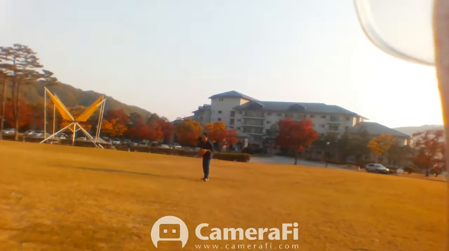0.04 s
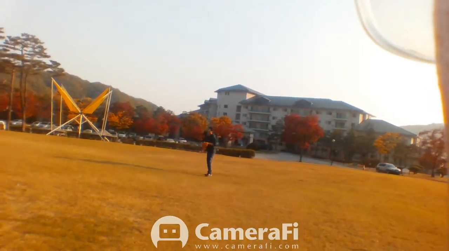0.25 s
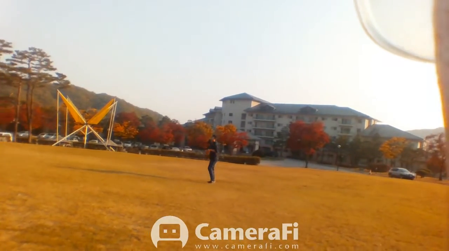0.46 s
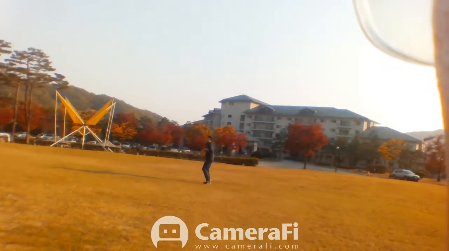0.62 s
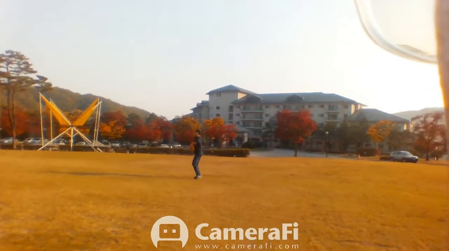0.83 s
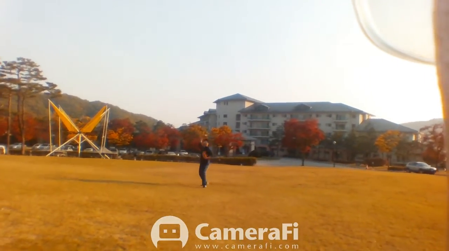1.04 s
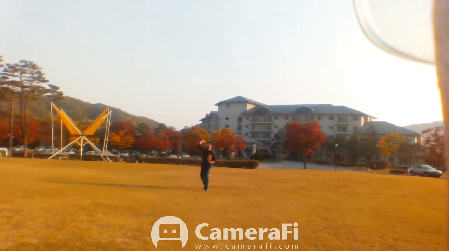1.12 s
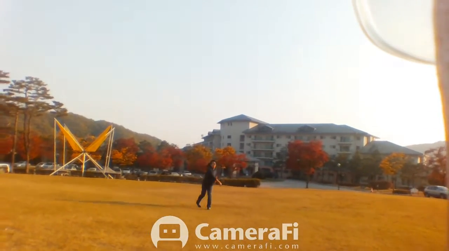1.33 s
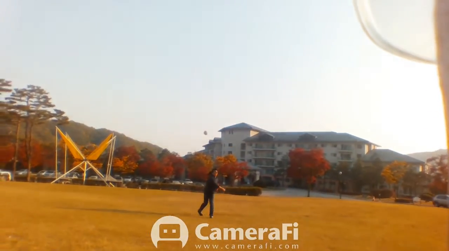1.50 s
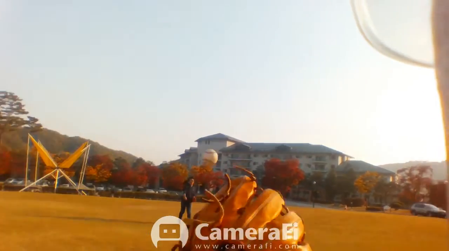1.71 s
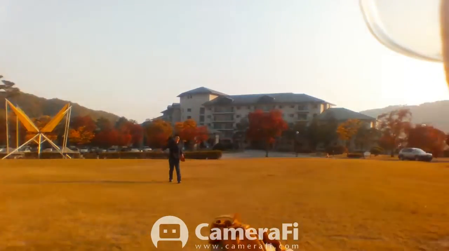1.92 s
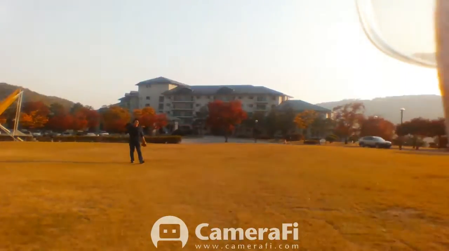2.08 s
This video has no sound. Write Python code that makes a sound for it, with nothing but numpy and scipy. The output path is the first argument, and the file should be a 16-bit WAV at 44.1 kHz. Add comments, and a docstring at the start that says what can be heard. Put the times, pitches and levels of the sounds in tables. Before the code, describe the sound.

A ball smacks sharply into a leather glove right beside a small head-worn microphone, slightly overloaded. Before it, wind rumbles, thuds and crackles heavily, then drops away; afterwards only faint rustles and quiet outdoor hush on an open lawn.

```python
"""An open lawn: a thrown ball smacks into a leather glove next to a small head-worn camera.
Wind buffets the microphone: coloured noise rumbles, while pointed pulses thud and noise bursts crackle.
A damped housing resonance shapes the wind and dulls its treble. Damped modes and noise form the smack,
which overloads the input; the lawn scatters a faint late answer. A hush and soft rustles lie beneath.
"""
import sys
import numpy as np
from scipy import signal
from scipy.fft import rfft, irfft, next_fast_len
from scipy.io import wavfile
from scipy.ndimage import map_coordinates

SR = 44100
rng = np.random.default_rng(int(sys.argv[2]) if len(sys.argv) > 2 else 0)


def to_wav(sig):
    """Store sig (one row per channel, or 1-D mono) as 16-bit WAV at the path in sys.argv[1].

    Samples outside -1..1 are clipped; the rate is SR.
    """
    pcm = np.clip(np.atleast_2d(sig), -1, 1) * 32767
    pcm = np.round(pcm).astype(np.int16)
    wavfile.write(sys.argv[1], SR, pcm.T)  # frames by channels


N = 94815
T = np.arange(N) / SR  # time axis [s]

# Strength of the wind: t/s, level/dB; the brief rise at 1.7 s is a low thump that comes with the smack
WIND_STRENGTH = [(0.0, -51.5), (0.15, -25), (0.17, -29.5), (0.27, -24), (0.3, -30.5), (0.48, -31),
                 (0.54, -16.5), (0.6, -31), (0.66, -15), (0.7, -29.5), (0.72, -15.5), (0.85, -18.5),
                 (0.97, -16), (0.98, -19.5), (1.13, -20.5), (1.16, -11.5), (1.41, -29), (1.44, -25.5),
                 (1.51, -47.5), (1.64, -62), (1.7, -25.5), (1.78, -38.5), (1.93, -34), (2.06, -45),
                 (2.1, -28), (2.15, -38.5)]
# Spectrum of the low rumble: f/Hz, relative level/dB [dB per Hz]
RUMBLE_SPECTRUM = [(8.8, -29.5), (15, 0), (59, 1), (140, -14.5), (180, -38), (310, -120)]
# Spectrum of the upper part of the rumble: f/Hz, relative level/dB [dB per Hz]
FLUTTER_SPECTRUM = [(70, -28), (140, -1.13), (260, -7.5), (450, -23), (700, -75.5)]
# Single buffets: t/s, crackle level/dB, crackle decay/ms (before CRACKLE_STRETCH),
# thud level/dB (before THUD_LIFT_DB)
BUFFETS = [(0.099, -83, 1.9, -28.5), (0.1425, -76, 1.8, -46), (0.2035, -48.5, 2.4, -31),
           (0.219, -40, 0.78, -18), (0.2685, -21, 1.42, -12.5), (0.344, -60, 2.6, -35),
           (0.3667, -62, 1.3, -23.5), (0.4159, -55, 2.2, -20.5), (0.4433, -51.5, 4.2, -20),
           (0.4939, -32, 0.68, -8.5), (0.504, -32, 1.8, -31.5), (0.539, -16.5, 3, -5.5),
           (0.5487, -25, 1.3, -13), (0.5697, -42, 2.2, -33), (0.5838, -44, 3.5, -20),
           (0.602, -66.5, 2.5, -40), (0.6202, -36, 1.5, -23), (0.6509, -21.5, 1.7, -8),
           (0.667, -25.5, 1.1, -28), (0.687, -40, 4.3, -17), (0.7224, -19.5, 0.78, -16),
           (0.7304, -20.0, 3.8, -12), (0.743, -16, 1.86, -8.5), (0.756, -30, 2.3, -12),
           (0.7755, -19.5, 4.1, -6.0), (0.7885, -42, 1.6, -28), (0.797, -44.5, 1.8, -13),
           (0.8202, -18.5, 2, -10.0), (0.836, -27, 3.3, -10.5), (0.8611, -20.5, 2.9, -10),
           (0.9191, -23.5, 1.7, -11.5), (0.93, -28, 1.4, -9.5), (0.9521, -26.0, 1.4, -25),
           (0.9662, -25.5, 1.6, -12), (0.9871, -27, 0.77, -13), (0.9973, -28, 2, -17),
           (1.0075, -30.5, 2, -11.5), (1.0353, -34.5, 2.9, -37.5), (1.0478, -40.5, 1.1, -18.0),
           (1.0536, -36, 1.3, -14), (1.0682, -34.5, 2.1, -13.5), (1.09, -41, 3.7, -16.5),
           (1.1155, -42, 2.9, -24.5), (1.1383, -32, 3.7, -14), (1.1491, -43.5, 0.9, -14.5),
           (1.1634, -23, 4.5, -9.5), (1.1806, -36, 0.9, -9.5), (1.194, -21, 2.2, -9.5),
           (1.209, -26.0, 2.1, -10), (1.2216, -42.5, 1.7, -24), (1.2351, -46, 1.1, -32.5),
           (1.244, -36.5, 2.8, -14), (1.2581, -27, 1.1, -41), (1.266, -32, 1.2, -12.5),
           (1.2844, -53.5, 0.95, -19), (1.2943, -66, 2.5, -21.5), (1.3321, -45.5, 2.8, -17.5),
           (1.3467, -42, 1.9, -28), (1.369, -52, 3.0, -23), (1.3865, -62, 1.8, -33),
           (1.4262, -48, 3.0, -22), (1.4525, -63, 1.5, -55), (1.8857, -69, 1.8, -43),
           (1.8987, -62.5, 3.0, -27), (1.933, -73, 2.8, -40), (2.0742, -64, 4.8, -48),
           (2.1052, -61, 7.8, -33), (2.115, -58, 3.0, -50), (.533, -25, 1.5, -22.5), (.7075, -30, 1.2, -24),
           (.7145, -23.5, 0.8, -9), (.8665, -20, 1.2, -13), (.876, -32, 1.73, -11.5), (.909, -26, 1.5, -18)]
# Spectrum of the crackle: f/Hz, relative level/dB [dB per Hz]
CRACKLE_SPECTRUM = [(150, -30.5), (350, 8.15), (700, -4.5), (1200, -16.5), (1800, -24), (2300, -55),
                    (3000, -82)]
# Spectrum of the distant outdoor hush: f/Hz, relative level/dB [dB per Hz]
HUSH_SPECTRUM = [(53, -30.5), (90, 13), (357, -12.5), (483, -10), (538, -15), (727, -10), (810, -18.5),
                 (883, -10), (1270, -11), (1550, -4), (2830, -29.5), (9440, -35.5), (15500, -45)]
# Faint rustles: t/s, level/dB, half length/s
RUSTLES = [(1.324, -56.5, 0.0081), (1.396, -51, .01), (1.885, -61, 0.019), (1.958, -53.5, 0.046),
           (2.03, -51, .01), (2.073, -56.5, 0.023)]
# Spectrum of the rustles: f/Hz, relative level/dB [dB per Hz]
RUSTLE_SPECTRUM = [(300, -9), (700, -4), (1100, -2), (1600, 5.5), (2200, -15), (4000, -46)]
# Contacts, in turn: ball meets web, ball meets palm, glove snaps shut: t/s, level/dB
CONTACTS = [(1.6968, -12), (1.698, 2), (1.7002, -3)]
# Modes of the hollow pocket: f/Hz, level/dB, decay by 60 dB [s]
POCKET_MODES = [(80, -30.5, .03), (348.4, -15, .04), (770, -8, .035), (1197, -8.5, 0.043), (1554, -1, .04),
                (1710, -14.5, 0.045)]
# Bright short modes of the leather: f/Hz, level/dB
LEATHER_MODES = [(3400, -12.5), (4600, -9.5), (6300, -25.5), (8100, -30.5), (10300, -28.5), (13600, -30)]
# Spectrum of the leather slap: f/Hz, relative level/dB [dB per Hz]
SLAP_SPECTRUM = [(120, -40.5), (200, 1), (1300, -0.5), (1590, -9), (2330, -7), (4500, -35), (5590, -37),
                 (8350, -20), (9140, -36), (15500, -44)]
# Spectrum of the ball scuffing into the pocket: f/Hz, relative level/dB [dB per Hz]
SCUFF_SPECTRUM = [(1500, -36), (2300, -4), (4500, 1.6), (5500, -20), (8500, -20), (11000, -22),
                  (15500, -27.5)]
# Scatter off the lawn: f/Hz, decay by 60 dB [s]
LAWN_DECAY = [(300, .13), (1500, .17), (3000, .15), (8000, .1)]

LUMPS_DB, RUMBLE_LUMPS_PER_S, FLUTTER_LUMPS_PER_S = 3.5, 16, 45
# Growth: dB per dB of wind strength, counted from the strongest wind
FLUTTER_DB, FLUTTER_GROWTH = -10, 1.352
EDDIES_PER_S, EDDY_DB, EDDY_RANGE_DB, EDDY_MS, EDDY_GROWTH = 90, -5.5, 5, 2.3, 0.63
CRACKLE_STRETCH = 1.1
THUD_MS, THUD_MS_PER_DB, THUD_LIFT_DB = 0.97, 0.05, 5.5  # weaker thuds are broader
# Suction beside each spike: depth over its height; width and lag over its width
TROUGH_DEPTH, TROUGH_WIDTH, TROUGH_LAG = 0.49, 2.33, 1.97
HOUSING_HZ, HOUSING_WIDTH_HZ, HOUSING_EDGE_HZ = 1780, 2100, 2100
HUSH_DB = -55.5
RISE_S, LEATHER_T60_S = 0.00037, 0.007
SLAP_DB, SLAP_T60_S = -14, 0.03
SCUFF_START_S, SCUFF_STOP_S, SCUFF_DB, SCUFF_FADE_DB = 1.698, 1.7175, -30.5, -7
LAWN_LAG_S, LAWN_DB, LAWN_EDGE_HZ = 0.034, -29.5, 2600
CLIP_LEVEL, CLIP_HARDNESS, BAND_LIMIT_HZ = 0.99, 20, 15800


def amp(db):
    """Level: the amplitude ratio is ten to the power dB over 20."""
    return 10 ** (np.asarray(db) / 20)


def unit(x):
    """Normalization: scale to an rms of 1."""
    return x / np.sqrt(np.mean(x ** 2) + 1e-20)


def along(points, hz):
    """Interpolation of a property on a logarithmic frequency axis."""
    f, value = np.transpose(points)
    return np.interp(np.log(hz + 1), np.log(f + 1), value)


def wobble(rate):
    """Random fluctuation: a smooth curve through `rate` random knots a second."""
    return map_coordinates(rng.standard_normal(N // 100), [T * rate])


def filtered(x, response):
    """Linear filtering: multiply the spectrum by a complex frequency response."""
    m = next_fast_len(N + SR // 2)  # spare length keeps the tail from wrapping round
    return irfft(rfft(x, m) * response(np.fft.rfftfreq(m, 1 / SR)), m)[:N]


def noise(spectrum):
    """Coloured noise: white noise given a spectrum and an rms of 1."""
    white = rng.standard_normal(N)
    return unit(filtered(white, lambda hz: amp(along(spectrum, hz))))


def housing(x):
    """Damped resonance: a second-order response followed by a steep fall."""
    def response(f):
        resonance = HOUSING_HZ ** 2 / (HOUSING_HZ ** 2 - f * f + 1j * f * HOUSING_WIDTH_HZ)
        return resonance / (1 + (f / HOUSING_EDGE_HZ) ** 8)
    return filtered(x, response)


def spikes(s, db, ms, trough):
    """Pressure pulses: each pointed peak has a wide shallow trough of suction beside it."""
    at = np.round(s * SR).astype(int)[:, None] + np.arange(-SR // 20, SR // 20)
    u = (at / SR - s[:, None]) / (ms[:, None] / 1000)  # time in pulse widths
    peak = 1 / (1 + u ** 2)
    suction = TROUGH_DEPTH / (1 + ((u - trough[:, None]) / TROUGH_WIDTH) ** 2)
    pulses = amp(db)[:, None] * (peak - suction)
    # A second of margin at either end holds pulses that overhang
    return np.bincount((at + SR).ravel(), pulses.ravel(), N + 2 * SR)[SR:SR + N]


def rumble(strength_db):
    """Turbulent pressure: lumpy noise whose upper part grows faster than the wind strength."""
    low = unit(amp(LUMPS_DB * wobble(RUMBLE_LUMPS_PER_S)) * noise(RUMBLE_SPECTRUM))
    flutter = unit(amp(LUMPS_DB * wobble(FLUTTER_LUMPS_PER_S)) * noise(FLUTTER_SPECTRUM))
    top = strength_db.max()
    flutter_db = top + FLUTTER_GROWTH * (strength_db - top) + FLUTTER_DB
    return amp(strength_db) * low + amp(flutter_db) * flutter


def buffets():
    """Gust impact: a pressure pulse thuds within a two-sided exponential burst of crackle."""
    s, crackle_db, decay_ms, thud_db = np.transpose(BUFFETS)
    side = rng.choice([-1, 1], len(s))  # trough before or after the peak
    width_ms = THUD_MS + THUD_MS_PER_DB * (thud_db.max() - thud_db)
    thuds = spikes(s, thud_db + THUD_LIFT_DB, width_ms, TROUGH_LAG * side)
    bursts = np.zeros(N)
    for at, db, ms in zip(s, crackle_db, decay_ms):
        bursts += amp(db) * np.exp(-np.abs(T - at) / (CRACKLE_STRETCH * ms / 1000))
    return thuds + bursts * noise(CRACKLE_SPECTRUM)


def eddies(strength_db):
    """Poisson process: small pulses at random times, their level following the wind strength."""
    u = rng.random((400, 4))  # spacing, level, width, trough lag
    s = np.cumsum(-np.log(u[:, 0])) / EDDIES_PER_S
    inside = s < T[-1]
    u, s = u[inside], s[inside]
    top = strength_db.max()
    db = top + EDDY_GROWTH * (np.interp(s, T, strength_db) - top) + EDDY_DB
    db = db - EDDY_RANGE_DB * u[:, 1]
    return spikes(s, db, EDDY_MS * (0.5 + u[:, 2]), TROUGH_LAG * (2 * u[:, 3] - 1))


def wind():
    """Superposition: rumble, buffets and eddies add, and the housing filters their sum."""
    strength_db = np.interp(T, *np.transpose(WIND_STRENGTH))
    return housing(rumble(strength_db) + buffets() + eddies(strength_db))


def background():
    """Stationary noise: a steady hush, with rustles as noise under Gaussian envelopes."""
    swell = sum(amp(db) * np.exp(-((T - s) / half) ** 2) for s, db, half in RUSTLES)
    return amp(HUSH_DB) * noise(HUSH_SPECTRUM) + swell * noise(RUSTLE_SPECTRUM)


def scuff():
    """Friction: a noise that weakens as the ball slides, until it rests."""
    u = (T - SCUFF_START_S) / (SCUFF_STOP_S - SCUFF_START_S)
    level = (u > 0) * amp(SCUFF_DB + SCUFF_FADE_DB * np.clip(u, 0, 1))
    ending = np.clip(10 * (1 - u), 0, 1)  # fades over the last tenth
    return level * ending * noise(SCUFF_SPECTRUM)


def catch():
    """Impact excitation: each contact rings damped modes of the glove and throws a slap of noise."""
    out = scuff()
    slap_noise = noise(SLAP_SPECTRUM)
    modes = POCKET_MODES + [(hz, db, LEATHER_T60_S) for hz, db in LEATHER_MODES]
    for s, db in CONTACTS:
        t = np.maximum(T - s, 0)
        ring = sum(amp(level - 60 * t / t60) * np.sin(2 * np.pi * hz * t) for hz, level, t60 in modes)
        slap = amp(SLAP_DB - 60 * t / SLAP_T60_S) * slap_noise
        rise = 1 - np.exp(-t / RISE_S)
        out += amp(db) * rise * (ring + slap)
    return out


def ground(x):
    """Diffuse scattering: a dull late answer in which each frequency decays at its own rate."""
    hz, t, z = signal.stft(rng.standard_normal(SR // 2), SR, nperseg=256)
    decay = amp(-60 * t / along(LAWN_DECAY, hz)[:, None])
    tail = signal.istft(z * decay, SR, nperseg=256)[1]
    scattered = signal.fftconvolve(x, tail / np.linalg.norm(tail))[:N]

    def lag_and_dull(f):
        return np.exp(-2j * np.pi * f * LAWN_LAG_S) / (1 + (f / LAWN_EDGE_HZ) ** 4)
    return filtered(scattered, lag_and_dull)


def scene():
    """Superposition: wind, background, smack and the lawn's answer to the smack add."""
    smack = catch()
    return (wind() + background() + smack + amp(LAWN_DB) * ground(smack))[None]


def record(dry):
    """Saturation and band limit: the input clips, then nothing passes above the limit."""
    x = dry[0]
    clipped = x / (1 + np.abs(x / CLIP_LEVEL) ** CLIP_HARDNESS) ** (1 / CLIP_HARDNESS)
    return filtered(clipped, lambda hz: hz < BAND_LIMIT_HZ)[None]


dry = scene()
out = record(dry)
to_wav(out)
```